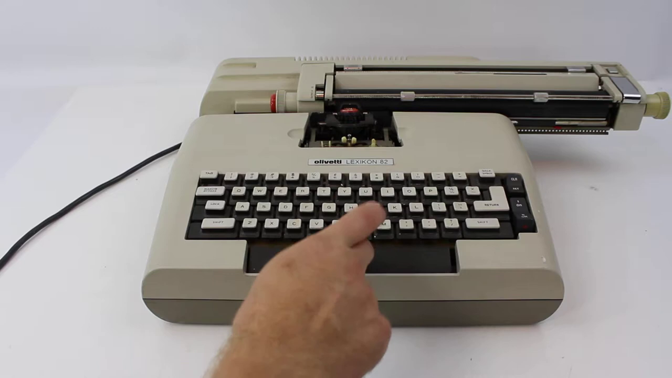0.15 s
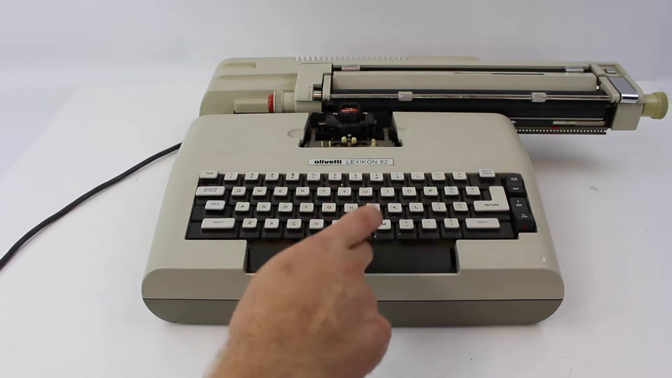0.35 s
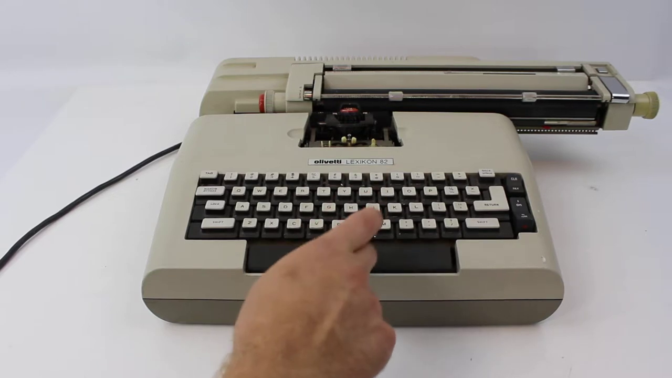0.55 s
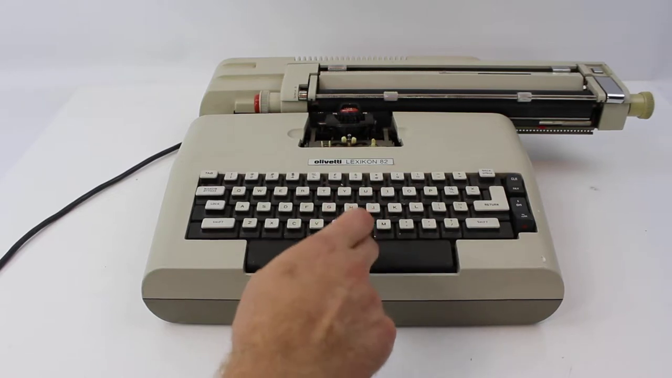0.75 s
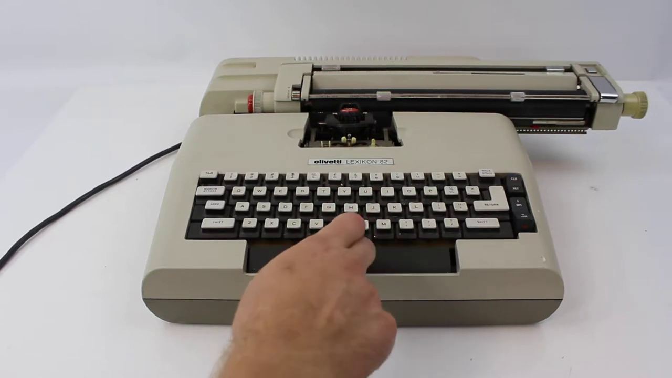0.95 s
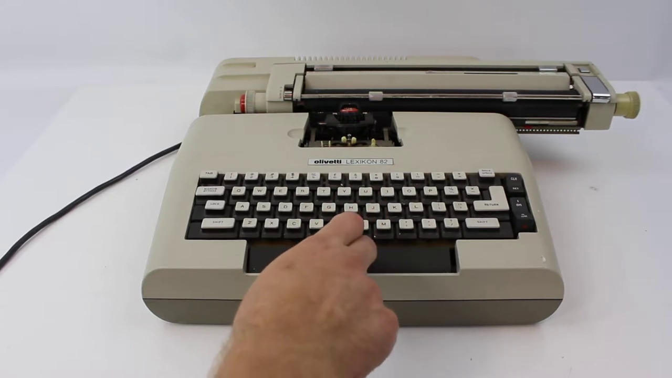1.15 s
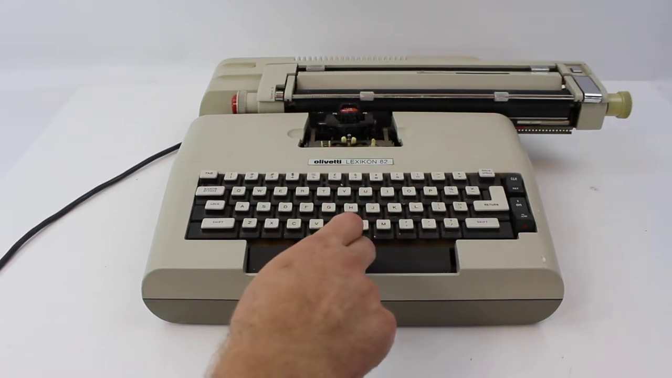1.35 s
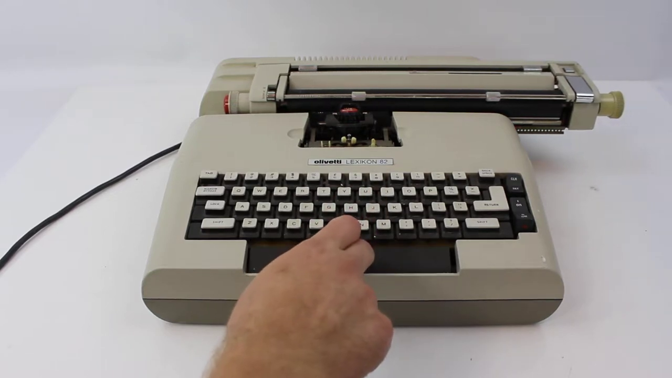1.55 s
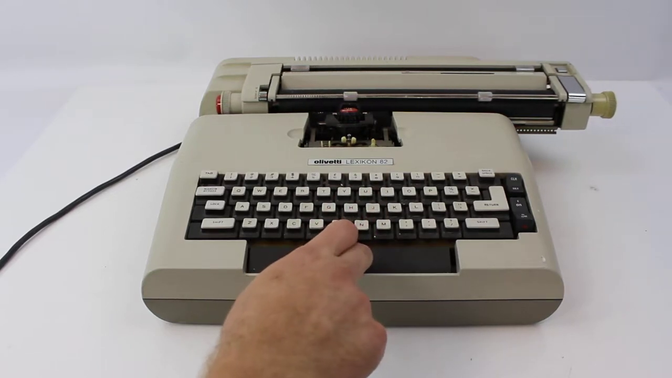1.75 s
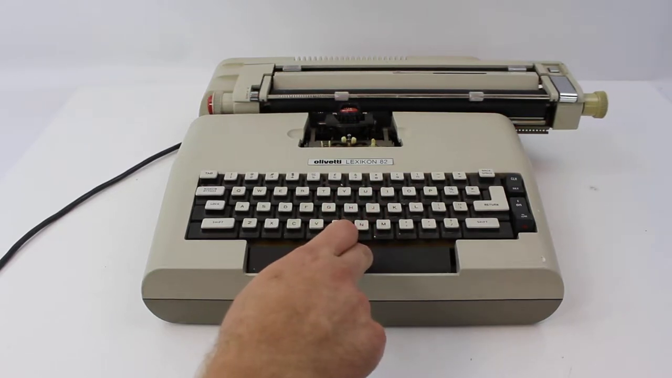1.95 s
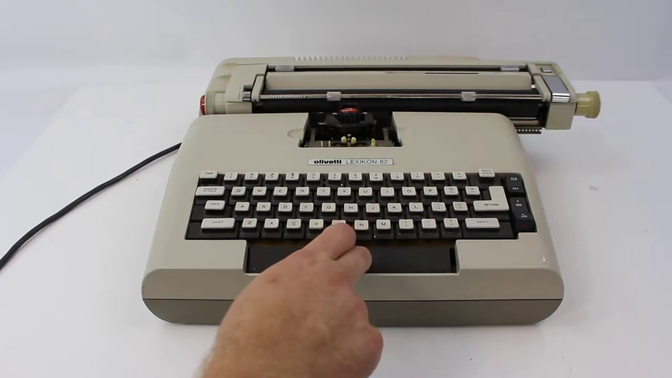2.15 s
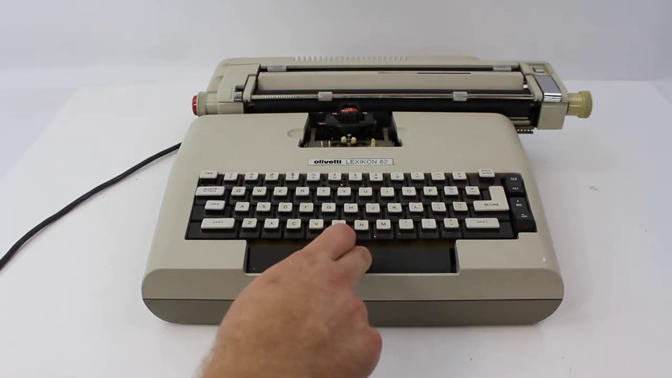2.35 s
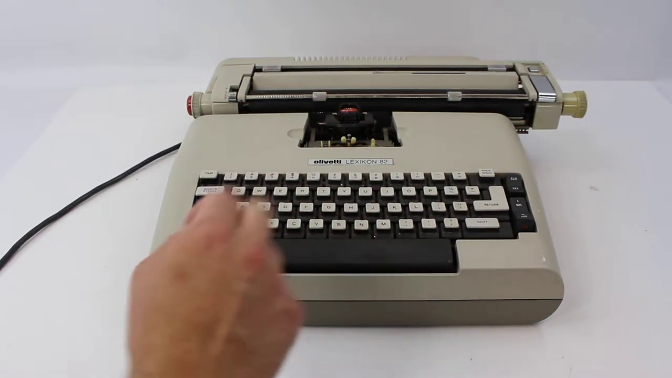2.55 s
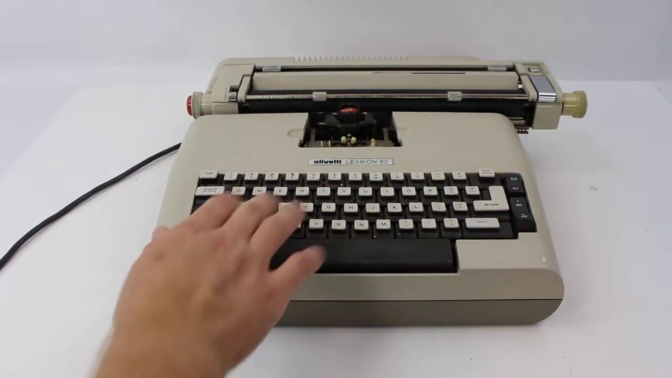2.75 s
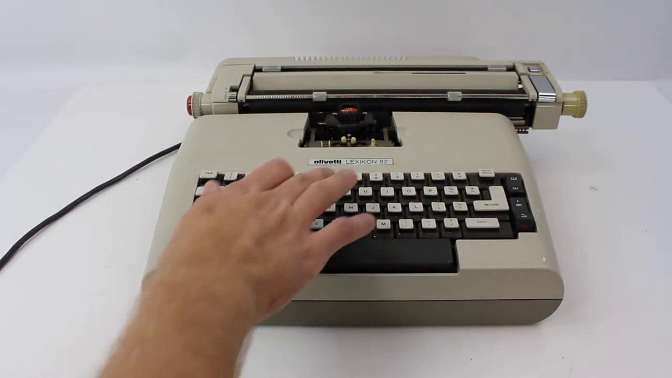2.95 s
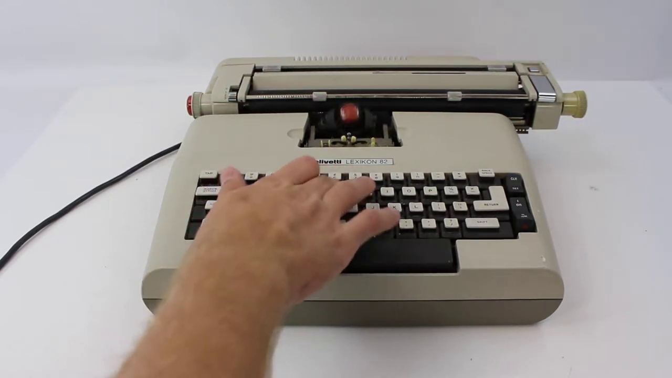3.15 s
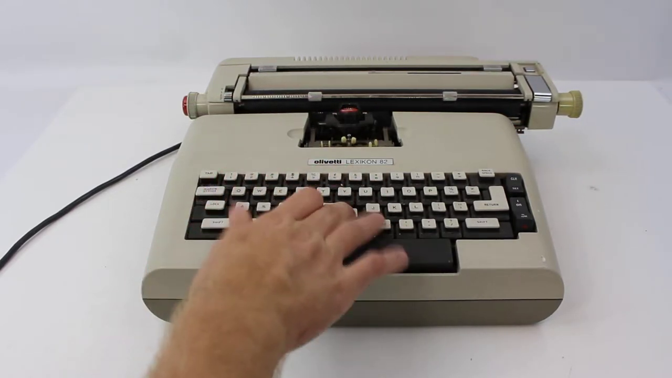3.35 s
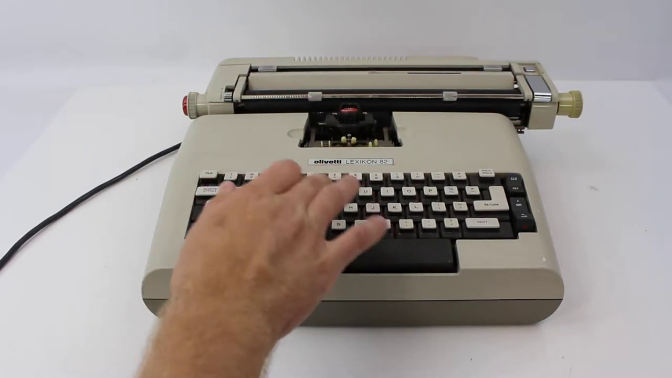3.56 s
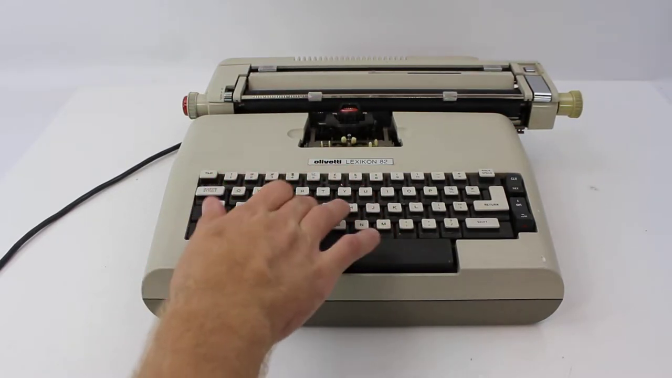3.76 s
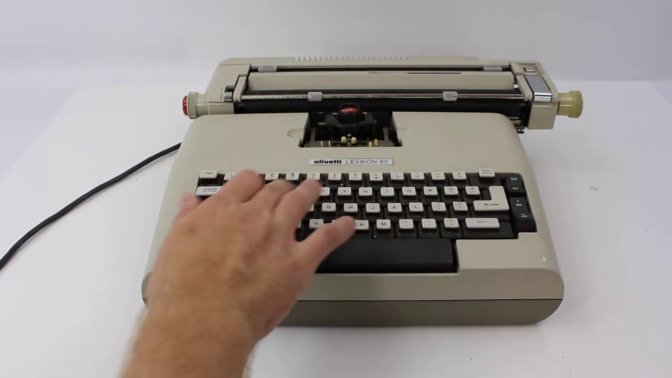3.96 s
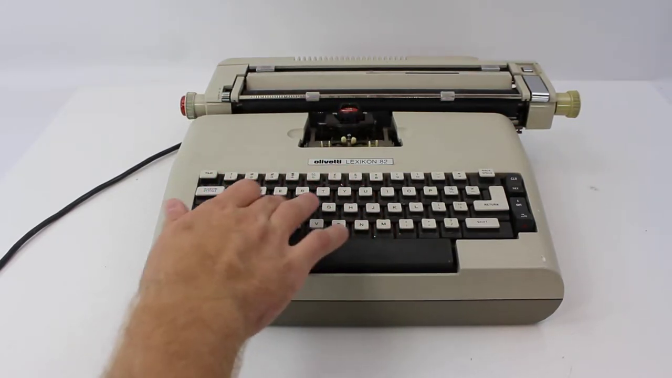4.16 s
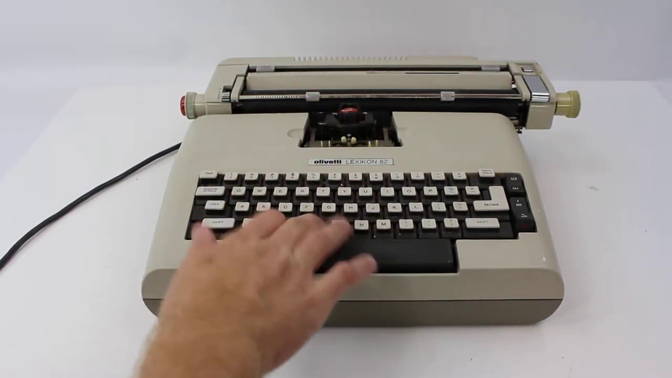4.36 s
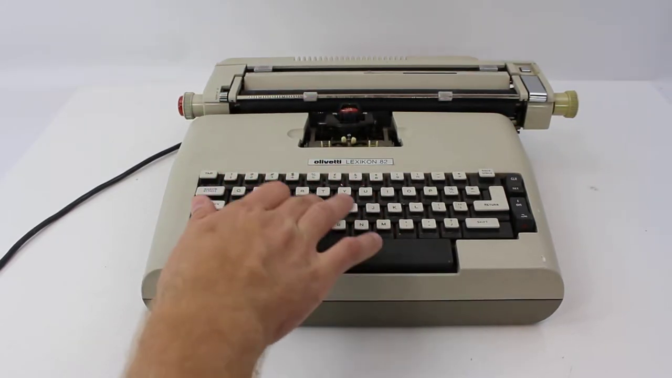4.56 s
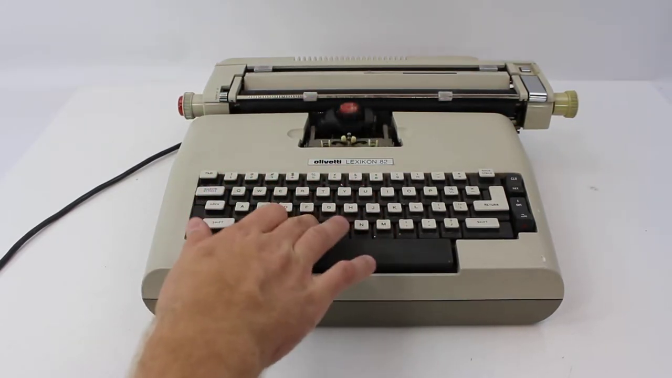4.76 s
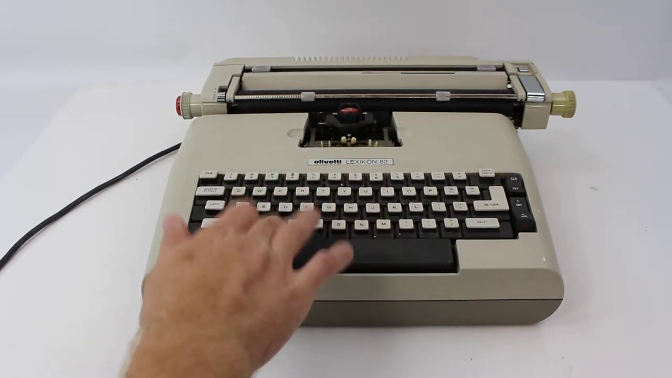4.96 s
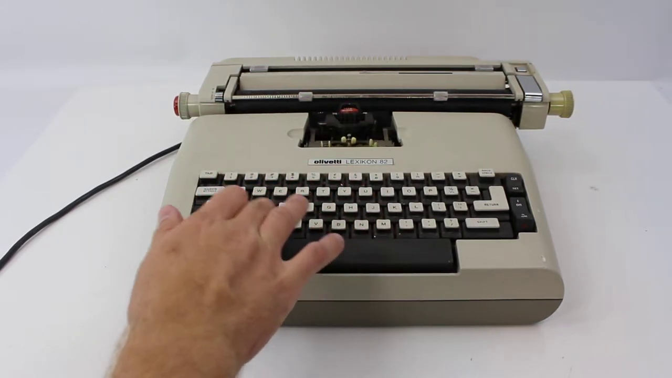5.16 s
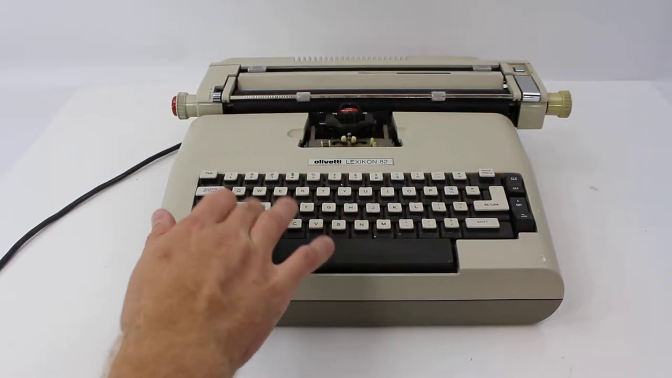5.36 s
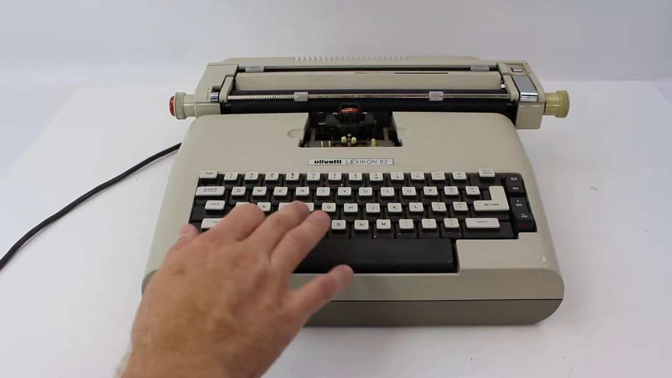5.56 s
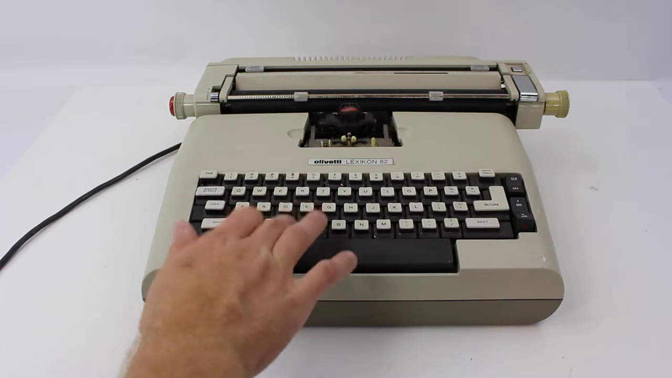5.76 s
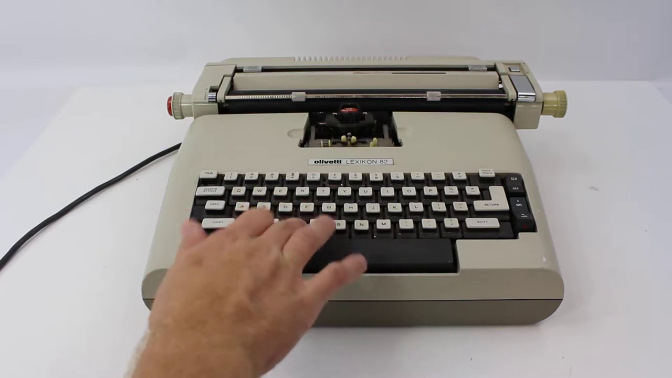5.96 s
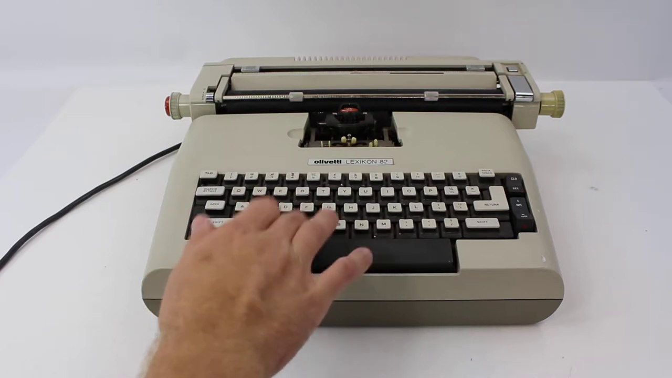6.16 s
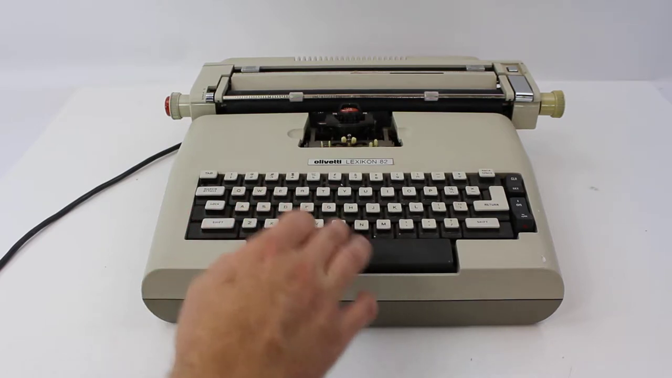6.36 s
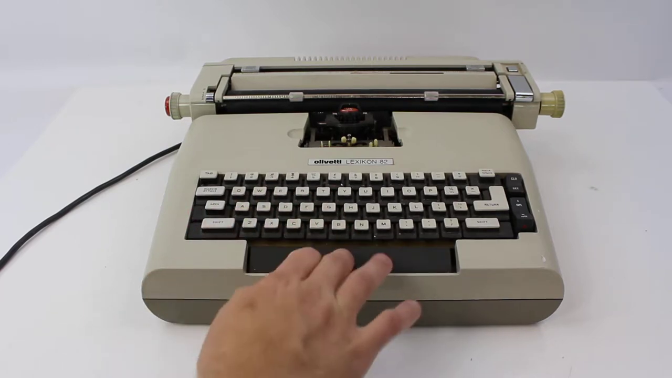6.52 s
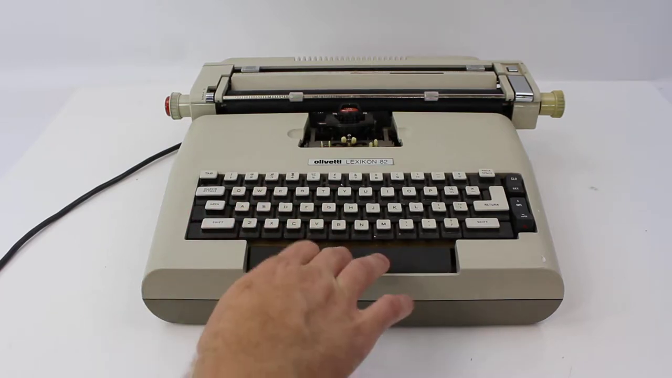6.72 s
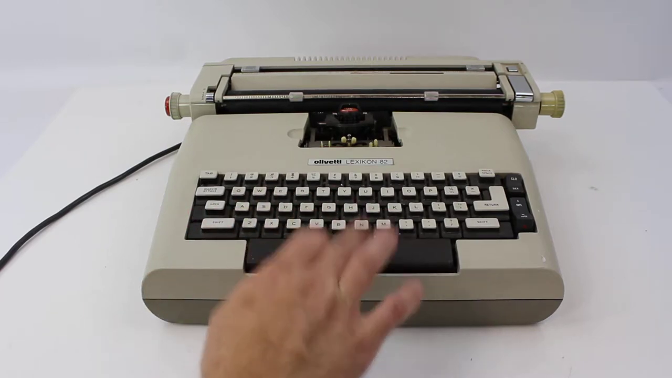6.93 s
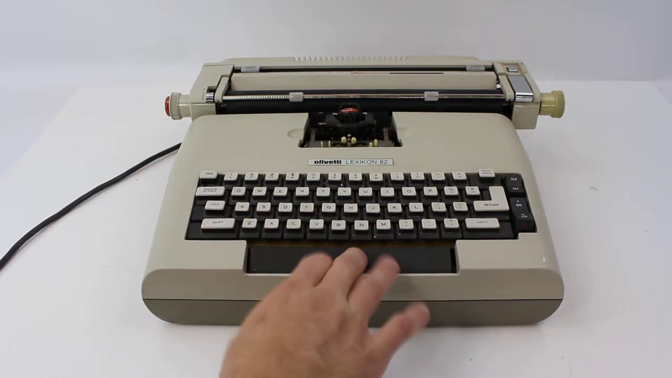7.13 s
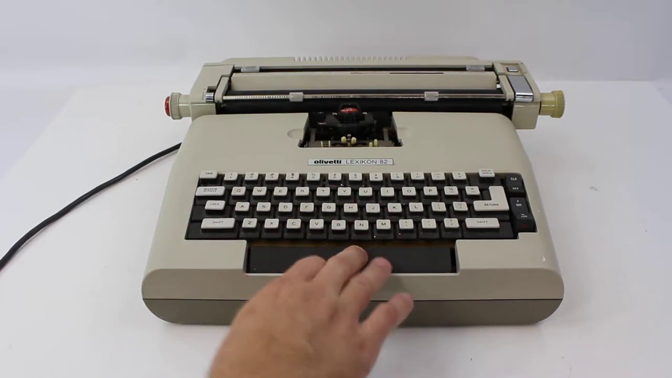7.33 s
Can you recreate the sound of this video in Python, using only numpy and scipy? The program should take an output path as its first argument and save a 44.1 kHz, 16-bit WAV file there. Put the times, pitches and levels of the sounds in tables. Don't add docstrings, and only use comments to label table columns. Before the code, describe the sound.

Electric typewriter close up: low motor rumble, space bar thumps, an even fast ratchet of carriage clicks, then hard single key strikes and final taps.

```python
import sys
import numpy as np
from scipy import signal
from scipy.fft import rfft, irfft, next_fast_len
from scipy.io import wavfile
from scipy.ndimage import uniform_filter1d, map_coordinates

SR = 44100
rng = np.random.default_rng(int(sys.argv[2]) if len(sys.argv) > 2 else 0)


def waveform_to_disk(signal):
    frames = np.transpose(np.atleast_2d(signal))
    scaled = np.clip(frames, -1, 1) * 32767
    samples = np.round(scaled).astype(np.int16)
    wavfile.write(sys.argv[1], SR, samples)


def linear_from_db(decibels):
    return 10 ** (np.asarray(decibels, float) / 20)


N = 325899

# (frequency [Hz], width [Hz], level [dB])
STEEL_MODES = [(5410, 620, 5), (6530, 830, -4.5), (7000, 97, -4), (7300, 26, 6), (7840, 60, -24),
               (10400, 150, -4)]
# (frequency [Hz], width [Hz], level [dB])
CASE_MODES = [(385, 47, -10), (609, 67, 7.5), (705, 65, 6), (1010, 60, -2), (1310, 35, -10),
              (1610, 30, -14), (2450, 60, -8)]
# (frequency [Hz], density [dB per Hz])
STEEL_COLOUR = [(1470, -13), (2500, -8.5), (4300, -2), (6700, -1), (10600, -2.5), (14300, -17),
                (15500, -24)]
# (frequency [Hz], density [dB per Hz])
COVER_COLOUR = [(470, -20.5), (800, -3.5), (994, -2), (2490, -1.5), (4500, -6.5), (5850, -28), (9900, -120)]
# (frequency [Hz], density [dB per Hz])
RATTLE_COLOUR = [(590, -6), (1000, 0), (1750, -3.5), (7450, -13), (11800, -24), (15500, -38)]
# (frequency [Hz], density [dB per Hz])
MOTOR_COLOUR = [(120, -53), (280, -12), (340, -5), (450, -2.5), (750, -15), (900, -13.5), (1500, -14),
                (3000, -24.5), (9000, -40), (12000, -48), (15500, -85)]
# (frequency [Hz], width [Hz], level [dB])
BEARING_MODES = [(1013, 55, -17), (2490, 51, -19)]
# (frequency [Hz], density [dB per Hz])
TABLE_COLOUR = [(12, -33), (20, -34), (102, -0.5), (184, -0.5), (253, -7), (300, -20.5), (390, -48),
                (660, -120)]
# (frequency [Hz], t60 [s])
ROOM_T60 = [(200, 0.49), (700, 0.15), (2000, 0.084), (10000, 0.052)]
# (time [s], level [dB])
MOTOR_LOAD = [(0, -22.5), (.07, -32), (.3, -34), (.43, -41), (.93, -33), (2.5, -30.5), (2.65, -34),
              (3.1, -29.5), (4.35, -33), (5.1, -37.5), (5.6, -38), (6, -36.5), (6.3, -36.5), (6.8, -28.5),
              (7.1, -31), (7.39, -31.5)]
# (start [s], end [s], level [dB])
BUSY_LEVERS = [
    (0, 0.043, -27),
    (0.254, 0.314, -27),
    (0.434, 0.993, -39),
    (1.012, 1.6, -39),
    (2.39, 2.61, -38),
    (2.8, 3.1, -51),
    (3.15, 3.452, -40),
    (7.26, 7.32, -34),
]
# (time [s], period [s])
CAM_SHAFT = (2.673, .15788)
# (start [s], end [s])
TABLE_HUM_SPAN = (1.12, 2.54)
# (end [s], start [s])
THINNED_SPAN = (.12, 6.25)
# (frequency [Hz], level [dB])
BAND_SHADE = [(2400, 0), (2750, -10), (3000, 0)]

# (clutch time [s], wind-up [dB], key lead [s], head turn [dB], case note [Hz])
KEY_PRESSES = [
    (3.1298, -16.5, 0.027, -10, 585),
    (4.0738, -17, 0.031, -13, 610),
    (4.403, -20, 0.027, -14.5, 576),
    (4.7258, -20, 0.034, -12, 725),
    (5.023, -21, 0.03, -14, 412),
    (5.291, -25.5, .03, -20, 385),
    (5.744, -24, 0.027, -15.5, 386),
    (5.964, -24, .031, -17.5, 616),
]
# (time [s], blow [dB], swing and rebound [dB], case note [Hz])
HEAD_STRIKES = [(3.1992, -5, -11, 730), (3.278, -9, -18.5, 606), (4.1463, -9, -12, 634),
                (4.4678, -2.5, -13, 637), (4.7946, -4, -15, 387), (5.0922, -8, -13, 622),
                (5.3582, -10, -15, 722), (5.435, -16, -15.5, 726), (5.817, -8, -13.5, 700),
                (6.0334, -5, -15, 615), (6.187, -14, -23.5, 710)]
# (key down [s], level [dB], stop [s], stop level [dB])
BASKET_SHIFTS = [
    (3.376, -24, 3.506, -13.5),
    (3.7085, -18.5, 3.8216, -10),
]
# (time [s], blow [dB], approach [dB], cover ring [dB])
SPACE_BLOWS = [
    (0.1606, -5.5, -15, -10.5),
    (.3264, -6, -16, -6.5),
    (0.5364, -8, -24, -12.5),
    (0.7024, -10, -27, -12.5),
    (0.8725, -11, -35, -17.5),
    (2.4756, -10, -20, -20),
    (6.4933, -9.5, -19.5, -16.5),
    (6.9959, -5.5, -17, -37),
    (7.1638, -12.5, -23.5, -15.5),
    (7.318, -9, -20.5, -23),
]
# (time [s], catch [dB], slide after it [dB])
PAWL_CATCHES = [(0.228, -12.5, -19), (0.3968, -14, -27), (0.4516, -9.5, -19), (0.51, -11.5, -28),
                (0.5651, -12, -20), (.62, -11.5, -18.5), (0.7333, -13.5, -27), (0.7905, -11, -20),
                (0.902, -16, -34), (7.0684, -23.5, -33), (7.2506, -18, -28)]
# (time [s], steel [dB], plastic [dB], t60 [s])
STRAY_CONTACTS = [(.0131, -22.5, -6, 0.18), (.0569, -28, -9, 0.039), (.4305, -30, 8, 0.17),
                  (.591, -25, 0, .2), (.7685, -27, 0, .2), (3.482, -25, 2, .1), (3.114, -19, 1, .1),
                  (6.4765, -23, -5, .1), (7.1515, -25, -10, .08), (7.24, -36, 0, .1), (7.064, -38, 0, .1),
                  (2.4463, -24, -14, .12), (2.4918, -16, -2.5, 0.16), (3.218, -18.5, -4.5, 0.28),
                  (3.5331, -23.5, 3.5, 0.083), (3.809, -20, -7, 0.05), (4.2676, -37, 4, .08),
                  (4.5641, -26, -4, 0.075), (4.8739, -30.5, -6, 0.097), (5.3997, -24.5, -4, 0.32),
                  (6.113, -31, -4, .2), (6.1266, -24.5, -1, 0.069), (6.145, -27, 0, 0.15),
                  (6.81, -16, -4.5, 0.091), (6.833, -12, -10, 0.08), (6.8709, -27.5, -3, .09),
                  (7.0998, -22, -12, 0.12), (7.285, -24, -6, 0.13)]
# (time [s], peak [dB], note [Hz], table [dB])
STRAY_THUDS = [(.11, -24, 605, -13), (.474, -19, 604, -22), (.638, -19, 660, -15), (1.678, -22.5, 606, -15),
               (1.729, -22.5, 389, -12), (1.888, -22, 400, -18), (2.83, -24, 394, -34),
               (2.987, -22.5, 403, -37), (3.784, -19, 405, -22), (4.112, -12, 680, -25),
               (6.778, -23.5, 382, -15), (6.933, -22, 385, -13)]
# (time [s], level [dB], note [Hz], t60 [s])
PANEL_RINGS = [(.6365, -15, 1394, .07), (2.4488, -13, 2200, .03), (2.49, -15.5, 1600, 0.13),
               (3.1188, -14, 1270, 0.052), (3.1996, -4.5, 2490, 0.043), (3.2789, -11, 2490, .025),
               (3.535, -11, 2850, 0.047), (3.7184, -25, 1870, .045), (3.8152, -8.5, 1310, 0.048),
               (3.851, -11, 2940, 0.028), (4.1455, -7, 2190, 0.03), (4.566, -26, 5830, 0.091),
               (6.8444, -14.5, 1350, 0.064), (7.0698, -11, 2100, 0.022), (7.1005, -18.5, 2300, .04),
               (7.104, -20, 1340, 0.07), (7.2515, -12, 2100, 0.02)]

# (delay [s], steel [dB], plastic [dB], t60 [s])
KEY_DOWN = [
    (0, -2.5, -9, 0.085),
    (.011, -4, -1, 0.25),
]
CLUTCH_TRIP = [
    (0, 0, 2.8, 0.21),
]
HEAD_TURN = [
    (.031, 0, -4, 0.12),
]
HEAD_BLOW = [
    (0.0008, -4.5, -6, 0.039),
]
HEAD_SWING = [
    (-.0095, -2, -2, 0.1),
    (-.005, -5, -5, 0.085),
    (.011, 0, -4, 0.094),
    (.025, -5.5, -1, 0.099),
    (.075, -25.5, 2, 0.15),
]
SHIFT_DOWN = [
    (0, -2, -7, 0.26),
    (.01, 0, -1, 0.13),
    (.03, -2.5, -1.5, .12),
]
SHIFT_STOP = [
    (-.012, -8.5, 0.5, 0.19),
    (0, 0, -2, 0.078),
    (.027, -2, 0.5, 0.048),
    (.067, -15.5, 2.5, 0.082),
]
BAR_APPROACH = [
    (-0.0105, -9, 2, 0.087),
    (-0.0075, 1.5, -9.5, 0.12),
]
BAR_BLOW = [
    (0.00033, 0, -5, 0.049),
]
PAWL_CATCH = [
    (0.00017, 0.88, -20, 0.053),
]
RACK_SLIDE = [
    (0.014, -5, 0, 0.16),
    (0.033, -2, 0, 0.13),
]

# (time [s], peak [dB], note [Hz])
TIP_PINGS = [(0.1643, 0, 6160), (0.3277, -1, 10080), (0.334, -5.0, 9690), (0.4553, -11, 6610),
             (0.5385, -8, 5900), (0.5671, -9, 9970), (0.704, -5.5, 10190), (0.7356, -8, 5710),
             (0.8756, -7, 5810), (1.0168, -10, 6440), (1.185, -8, 6890), (1.3002, -4, 5470),
             (1.5232, -12, 6140), (1.6346, -10, 5190), (1.8044, -5, 6590), (1.9168, -7.5, 6460),
             (1.9748, -5.0, 6890), (2.1418, -10, 6630), (2.1975, -9, 5790), (2.2544, -9, 6010),
             (2.3098, -9, 5490), (2.3656, -6.0, 7260), (2.4218, -10, 7430), (2.4788, -9, 6550),
             (2.4943, -9, 6420), (3.133, -6.5, 3750), (3.1626, -7, 6520), (3.201, 0, 7640),
             (3.2796, -1, 3490), (3.8522, -8, 3340), (4.1468, -0.5, 7770), (4.1572, -6.0, 6400),
             (4.4337, -3, 7110), (4.4709, -2, 7800), (4.7866, -7.0, 7470), (4.7896, -3.5, 6590),
             (4.796, 0, 7730), (5.0893, -3, 6050), (5.0939, -2, 7520), (5.3596, 0, 3490),
             (5.3689, -5.5, 3530), (5.8168, -5.5, 4590), (5.8245, -5, 6090), (5.8306, -6.5, 5990),
             (6.0356, -1, 6960), (6.4962, -11, 5900), (6.8349, -10, 9540), (6.998, -2, 4950),
             (7.1648, -9, 5510), (7.3196, 0.0, 9750)]
# (time [s], steel peak [dB], cover [dB])
HARD_CLICKS = [(0.23, -8, -26), (0.397, -7, -36), (0.874, -3, -16), (3.1344, -9, -17), (3.1615, -6, -15),
               (3.1989, -3, -10), (3.279, -7, -12), (3.382, -20, -24), (3.5074, -6, -15), (3.534, -12, -18),
               (3.7174, -5, -27), (3.8082, -11, -23), (3.824, -7, -21), (3.85, -6, -15), (4.054, -7, -22),
               (4.0756, -11, -16), (4.1086, -9, -20), (4.1455, 0, -12), (4.1564, -5, -21),
               (4.375, -16, -33), (4.3829, -15, -27), (4.407, -5, -18), (4.4324, -3, -16.5),
               (4.469, -2, -8), (4.565, -20, -35), (4.6906, -21, -32), (4.728, -8, -18), (4.758, -11, -24),
               (4.795, 3, -17), (4.9934, -14, -23), (5.0235, -13, -21), (5.056, -12, -22),
               (5.0874, -1, -16), (5.0927, -4, -11), (5.2606, -13, -37), (5.2729, -16, -27),
               (5.2944, -18, -25), (5.3195, -13, -21), (5.3582, -8, -9.5), (5.4274, -10, -23),
               (5.436, -10, -22), (5.7175, -15, -28), (5.7493, -10, -21), (5.7773, -8, -29),
               (5.807, -7, -18), (5.816, -1, -20), (5.9337, -17, -32), (5.9648, -11, -25),
               (5.9968, -12, -22), (6.0347, -2, -16), (6.1135, -22, -32), (6.125, -16, -28),
               (6.1893, -14, -29), (6.833, -9, -26), (6.998, 4, -24), (7.0693, -12, -29),
               (7.1003, -11, -36), (7.163, -11, -24), (7.2516, -15, -21), (7.317, 2, -12)]
# (time [s], peak [dB], cover [dB])
TOOTH_SNAPS = [(0.959, -8.5, -30), (1.0157, -8, -27), (1.072, -7.5, -18.5), (1.1276, -9, -19),
               (1.1845, -5.5, -24), (1.2404, -6.5, -28), (1.297, -3, -18.5), (1.3534, -8, -27),
               (1.4095, -8.5, -20.5), (1.4652, -4.5, -34), (1.5215, -6, -24), (1.5777, -5.5, -25),
               (1.6337, -6, -19), (1.6903, -4.5, -28), (1.7466, -7, -15.5), (1.8024, -2, -19.5),
               (1.8593, -3, -29), (1.9154, -5, -22), (1.9713, -3, -24), (2.0279, -5.5, -34),
               (2.0837, -5.5, -33), (2.1406, -6, -34), (2.1967, -6.5, -29), (2.2528, -6, -34),
               (2.309, -4.5, -31), (2.365, -5.5, -28), (2.421, -4.5, -30)]
# (time [s], level [dB])
PAWL_RECOILS = [(0.9911, -28), (1.0446, -27), (1.0983, -26), (1.156, -23), (1.2138, -24), (1.2708, -24),
                (1.327, -28), (1.383, -29), (1.4393, -25), (1.4963, -25), (1.5509, -30), (1.6085, -25),
                (1.6634, -28), (1.7187, -24), (1.7773, -24), (1.832, -25.5), (1.89, -23), (1.9456, -26),
                (2.0022, -32), (2.0598, -33), (2.1155, -30), (2.1734, -32), (2.232, -30), (2.29, -28),
                (2.3477, -26), (2.4045, -32), (2.448, -26)]
# (frequency [Hz], density [dB per Hz])
PAWL_COLOUR = [(1180, -29), (2000, -12), (3580, -7.5), (5230, -4), (5890, -4), (10500, -1.5),
               (15500, -25.5)]
# (frequency [Hz], width [Hz], level [dB])
PAWL_MODES = [(5330, 300, 17), (6400, 300, 7)]
# (frequency [Hz], density [dB per Hz])
RACK_COLOUR = [(120, -12.5), (220, -5.5), (900, -0.5), (3000, -6.5), (6000, -8.5), (11000, -14.5),
               (15500, -42)]
# (multiple of step rate, rms [dB], loudest time [s], spread [s])
TABLE_HUM = [(3, -60, 1.8, 1), (4, -47, 1.7, 1.3), (5, -43.5, 2.45, .3), (6, -50.5, 1.8, .45),
             (7, -53, 1.3, .45), (8, -50, 1.75, .55), (10, -37, 1.45, .45), (12, -55, 2, .3),
             (13, -52, 1.5, .6)]
# (time [s], level [dB])
LEVER_TICKS = [
    (2.8214, -40),
    (2.9794, -36),
    (5.6561, -53),
]
# (frequency [Hz], width [Hz], level [dB])
LEVER_MODES = [(2200, 200, 8), (3020, 100, 2), (3620, 200, 24), (4440, 130, 10), (4930, 200, 16),
               (5410, 100, 2), (7180, 130, 4), (11000, 900, -6)]

FIRST_STEP_S, STEP_S = .9587, .05625


def unit(x):
    return x / np.sqrt(np.mean(x ** 2) + 1e-20)


def along(points, hz):
    f, v = np.transpose(points)
    return np.interp(np.log(hz + 1), np.log(f + 1), v)


def wobble(rate):
    knots = rng.standard_normal(int(N * rate / SR) + 4)
    return map_coordinates(knots, [np.arange(N) * rate / SR])


def coloured(x, spectrum, peaks=(), lift_db=0):
    m = next_fast_len(N + 8192) // 2 * 2
    hz = np.fft.rfftfreq(m, 1 / SR)
    modes = sum(linear_from_db(lift_db + db / 2) / (1 + (2 * (hz - c) / w) ** 2) for c, w, db in peaks)
    gain = linear_from_db(along(spectrum, hz)) * (1 + modes)
    cepstrum = irfft(np.log(np.maximum(unit(gain), 1e-6)), m)
    cepstrum[1:m // 2] *= 2
    cepstrum[m // 2 + 1:] = 0
    return irfft(rfft(x, m) * np.exp(rfft(cepstrum)), m)[:N]


def gritty(rough_db, rate, spots_db=0):
    z = signal.stft(rng.standard_normal(N) * linear_from_db(rough_db * wobble(rate)), nperseg=256)[2]
    field = uniform_filter1d(rng.standard_normal(z.shape), size=4, axis=0)
    field = uniform_filter1d(field, size=3, axis=1)
    return unit(signal.istft(z * linear_from_db(spots_db * unit(field)), nperseg=256)[1][:N])


def bursts(times, levels_db, t60s, rise):
    power, t = np.zeros(N + SR), np.arange(SR // 3) / SR
    for s, db, t60 in zip(times, levels_db, t60s):
        power[round(s * SR):][:len(t)] += linear_from_db(2 * (db - 60 * t / t60)) * (1 - np.exp(-t / rise)) ** 2
    return np.sqrt(power[:N])


def add_modes(track, s, db, hz, t60, rise, a, b):
    t = np.arange(SR // 5) / SR
    modes = np.sin(2 * np.pi * hz * t) + 0.54 * np.sin(2 * np.pi * hz * (1 + 0.0658 * a) * t + 3 * b)
    track[round(s * SR):][:len(t)] += linear_from_db(db - 60 * t / t60) * (1 - np.exp(-t / rise)) * modes


def cam_knocks():
    first, period = CAM_SHAFT
    t = np.arange(N) / SR
    turns = np.arange(first % period, N / SR, period)
    levels_db = 6 + 1.5 * rng.standard_normal(len(turns))
    envelope = bursts(turns, levels_db, np.full(len(turns), .18), rise=.008)
    envelope = envelope * np.where((t > FIRST_STEP_S) & (t < TABLE_HUM_SPAN[1]), .5, 1)
    thump = [(270, -40), (345, -3), (400, 0), (450, -14), (1500, -45), (5000, -110)]
    knock = coloured(envelope * rng.standard_normal(N), thump)
    note = np.zeros(N + SR)
    for s, (a, b) in zip(turns, rng.standard_normal((len(turns), 2))):
        db = 7 - 6 * (FIRST_STEP_S < s < TABLE_HUM_SPAN[1])
        add_modes(note, s, db, 390 * (1 + .04 * a), .16, .004, -2 + .5 * b, b)
    return knock + note[:N]


def drive():
    t = np.arange(N) / SR
    motor_db = np.interp(t, *np.transpose(MOTOR_LOAD))
    idle_db = -53
    busy_db = sum((db - idle_db) * (t >= a) * (t < b) for a, b, db in BUSY_LEVERS)
    rattle_db = idle_db + uniform_filter1d(busy_db, size=SR // 15)
    motor = coloured(gritty(rough_db=2.0, rate=120), MOTOR_COLOUR, CASE_MODES + BEARING_MODES, lift_db=4.5)
    motor = motor * linear_from_db(-2.5 + .7 * wobble(25))
    rattle = coloured(gritty(rough_db=3.0, rate=710), RATTLE_COLOUR)
    rattle = rattle * linear_from_db(rattle_db + 1.1 * wobble(54))
    table = linear_from_db(-47.5) * coloured(rng.standard_normal(N), TABLE_COLOUR)
    return linear_from_db(motor_db) * (motor + cam_knocks()) + rattle + table


def play(motion, s, db):
    return [(s + delay, db + steel_db, plastic_db, t60) for delay, steel_db, plastic_db, t60 in motion]


def contacts():
    rows = list(STRAY_CONTACTS)
    for s, db, early, turn_db, _ in KEY_PRESSES:
        rows += play(KEY_DOWN, s - early, db) + play(CLUTCH_TRIP, s, db) + play(HEAD_TURN, s, turn_db)
    for s, db, swing_db, _ in HEAD_STRIKES:
        rows += play(HEAD_BLOW, s, db) + play(HEAD_SWING, s, swing_db)
    for s, db, stop, stop_db in BASKET_SHIFTS:
        rows += play(SHIFT_DOWN, s, db) + play(SHIFT_STOP, stop, stop_db)
    for s, db, approach_db, _ in SPACE_BLOWS:
        rows += play(BAR_APPROACH, s, approach_db) + play(BAR_BLOW, s, db)
    for s, db, slide_db in PAWL_CATCHES:
        rows += play(PAWL_CATCH, s, db) + play(RACK_SLIDE, s, slide_db)
    return rows


def linkage():
    s, db, plastic_db, t60 = np.transpose(contacts())
    t60 = np.clip(t60, .02, .4)
    steel = bursts(s, db - .1, t60, rise=0.0017) * gritty(rough_db=2.0, rate=1700, spots_db=2.5)
    cover = bursts(s, db + plastic_db - .1, 1.266 * t60, rise=0.003)
    cover = cover * gritty(rough_db=1.5, rate=430, spots_db=3.0)
    crack = bursts(s + .001, db - 3 - 60 * t60, np.full(len(s), .006), rise=.0001) * rng.standard_normal(N)
    bright = coloured(steel + crack, STEEL_COLOUR, STEEL_MODES, lift_db=-6.5)
    return bright + coloured(cover + 0.39 * crack, COVER_COLOUR, CASE_MODES, lift_db=4.0)


def blows():
    rows = list(STRAY_THUDS)
    for s, db, early, _, hz in KEY_PRESSES:
        rows.append((s + 0.00714, -8.5 + 0.41 * db, hz, -8))
        rows.append((s - early + 0.00595, -17.5 + .5 * db, 400, -19))
    for s, _, db, hz in HEAD_STRIKES:
        rows.append((s + 0.0061, -5.5 + 0.86 * db, hz, -17))
    for s, db, stop, stop_db in BASKET_SHIFTS:
        rows.append((s + .033, -3.0 + db, 630, -11))
        rows.append((stop + 0.002, stop_db, 615, -16))
    for s, db, _, _ in SPACE_BLOWS:
        rows.append((s - .006, -13.5 + 1.08 * db, 420, -15))
    for s, db, _ in PAWL_CATCHES:
        rows.append((s + 0.0087, -17.5 + db, 390, -20))
    return rows


def case():
    knocks = blows()
    ring, push = np.zeros(N + SR), np.zeros(N)
    for (s, db, hz, table_db), (a, b) in zip(knocks, rng.standard_normal((len(knocks), 2))):
        add_modes(ring, s - .007, db - 1.0, hz, .085, .005, a, b)
        push[round(s * SR)] = linear_from_db(db + table_db + 26.0)
    for (s, db, hz, t60), (a, b) in zip(PANEL_RINGS, rng.standard_normal((len(PANEL_RINGS), 2))):
        add_modes(ring, s, db - 2.0, hz, t60, .0015, a, b)
    for s, db, _, cover_db in SPACE_BLOWS:
        add_modes(ring, s + 0.0075, cover_db + 15, 703, .048, .03, .3, 0)
        add_modes(ring, s - .0145, db - 7, 540, .04, .001, -1, 1)
    s, db, _, table_db = np.transpose(knocks)
    boom = bursts(s, db - 1.0, np.full(len(s), .1), rise=0.0032) * rng.standard_normal(N)
    shake = bursts(s, db + table_db - 4.0, np.full(len(s), .4), rise=0.0014) * rng.standard_normal(N)
    hollow = [(200, -40.5), (320, 6.0), (800, -3.5), (1300, -12.0), (2500, -89.0)]
    boom = coloured(boom, hollow, CASE_MODES, lift_db=-3.5)
    return ring[:N] + boom + coloured(push + shake, TABLE_COLOUR)


def pings():
    track, t = np.zeros(N), np.arange(-40, 80) / SR
    ping_s = .00028
    shape = np.exp(-.5 * (t / np.where(t < 0, ping_s / 2, ping_s * 1.5)) ** 2)
    for s, db, hz in TIP_PINGS:
        track[round(s * SR) - 40:][:len(t)] -= linear_from_db(db - 1) * shape * np.cos(2 * np.pi * hz * t)
    return track


def clicks():
    s, db, cover_db = np.transpose(HARD_CLICKS)
    same = np.ones(len(s))
    steel = bursts(s, db - 10.0, 0.013 * same, rise=.0001) * rng.standard_normal(N)
    cover = bursts(s, cover_db, 0.023 * same, rise=0.00039) * rng.standard_normal(N)
    dull = [(900, -28), (1800, -5.0), (2600, -3.0), (3600, -2.5), (5500, -25), (9000, -60)]
    return coloured(steel, PAWL_COLOUR, STEEL_MODES, lift_db=-6) + coloured(cover, dull)


def table_hum():
    t = np.arange(N) / SR
    start, end = TABLE_HUM_SPAN
    held = uniform_filter1d(1. * (t > start) * (t < end), SR // 5)
    hum = np.zeros(N)
    for k, db, loudest, spread in TABLE_HUM:
        swell_db = db - np.minimum(6 * ((t - loudest) / spread) ** 2, 12) + 1.2 * wobble(5)
        hum += linear_from_db(swell_db) * np.sqrt(2) * np.sin(2 * np.pi * k * (t - FIRST_STEP_S) / STEP_S)
    return held * hum


def carriage():
    s, db, cover_db = np.transpose(TOOTH_SNAPS)
    same = np.ones(len(s))
    snap = bursts(s, db - 7, 0.054 * same, rise=0.00058) * gritty(rough_db=2.5, rate=1200, spots_db=1.5)
    snap = snap + bursts(s, db - 9, 0.0064 * same, rise=.0001) * rng.standard_normal(N)
    cover = bursts(s, cover_db + 0.5, 0.047 * same, rise=0.00069) * rng.standard_normal(N)
    drop_s, drop_db = np.transpose(PAWL_RECOILS)
    recoil = bursts(drop_s, 0.5 + drop_db, 0.068 * same, rise=0.0006)
    recoil = recoil * gritty(rough_db=1.5, rate=470, spots_db=2)
    slide = bursts(drop_s, -24 * same, 0.27 * same, rise=0.0046)
    slide = slide * gritty(rough_db=1.5, rate=300, spots_db=2.5)
    dull = [(1200, -22), (2300, 2.0), (3200, 0), (4300, -1), (6000, -29)]
    second_touch = [(1000, -20), (2200, -1.5), (4500, 0), (7000, -7), (11000, -8), (15000, -28)]
    pawl = coloured(snap, PAWL_COLOUR, STEEL_MODES + PAWL_MODES, lift_db=-5.5)
    pawl = pawl + coloured(cover, dull) + coloured(recoil, second_touch)
    return pawl + coloured(slide, RACK_COLOUR, STEEL_MODES, lift_db=-10.0) + table_hum()


def lever():
    hits = list(LEVER_TICKS)
    for since in CAM_SHAFT[1] / 2 * np.arange(9):
        s, db = 6.306 + since, -31.5 + 9 * since
        hits += [(s, db), (s + .025, db - 1.5)]
    s, db = np.transpose(hits)
    taps = bursts(s, db - 7.5, np.full(len(s), .07), rise=0.0002) * gritty(rough_db=2.5, rate=700)
    thin = [(1000, -25), (3000, -3), (5000, -3), (7500, -9), (11000, -9), (15000, -30)]
    return coloured(taps, thin, LEVER_MODES, lift_db=2.5)


def room(x):
    hz, t, z = signal.stft(rng.standard_normal(SR // 2), SR, nperseg=256)
    decay = linear_from_db(-60 * t / along(ROOM_T60, hz)[:, None])
    tail = signal.istft(z * decay, SR, nperseg=256)[1]
    return signal.fftconvolve(np.pad(x, (300, 0)), tail / np.linalg.norm(tail))[:N]


def ducked(background, hits):
    keep = np.exp(-1 / (.06 * SR))
    loud = signal.lfilter([1 - keep], [1, -keep], hits ** 2)
    return background / (1 + loud / linear_from_db(-48.0)) ** 0.1


def scene():
    hits = linkage() + case() + pings() + clicks() + carriage() + lever()
    t = np.arange(N) / SR
    thinned = (t < THINNED_SPAN[0]) | (t > THINNED_SPAN[1])
    hits = np.where(thinned, coloured(hits, BAND_SHADE), hits)
    return (hits + linear_from_db(-12) * room(hits) + ducked(drive(), hits))[None]


def top_cut(x):
    return signal.sosfilt(signal.butter(12, 15690, fs=SR, output="sos"), x)


def record(dry):
    top = signal.butter(14, 15400, fs=SR, output="sos")
    low_cut = signal.butter(3, 40, "high", fs=SR, output="sos")
    limited = signal.sosfiltfilt(top, np.clip(dry, -.97, .97))
    return top_cut(signal.sosfilt(low_cut, limited))


dry = scene()
out = record(dry)
waveform_to_disk(out)
```